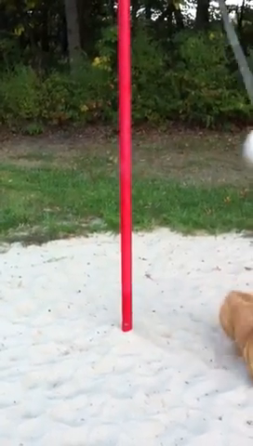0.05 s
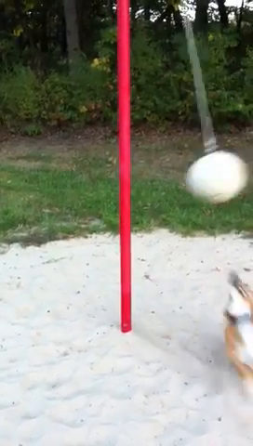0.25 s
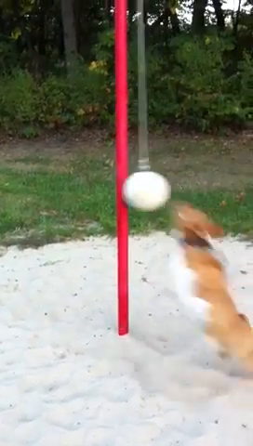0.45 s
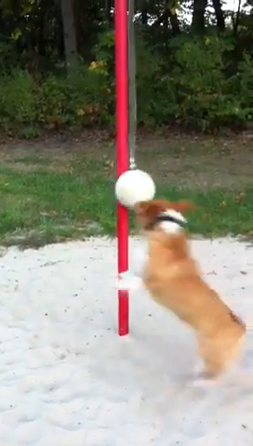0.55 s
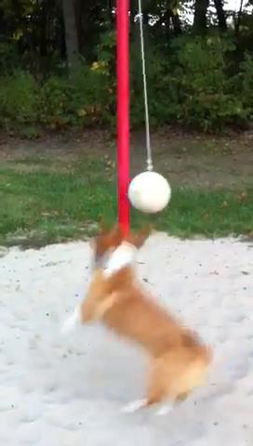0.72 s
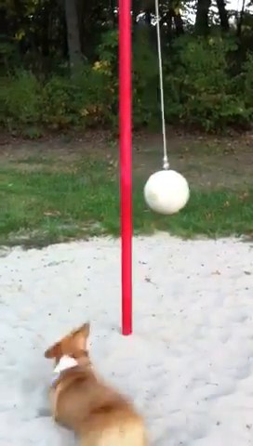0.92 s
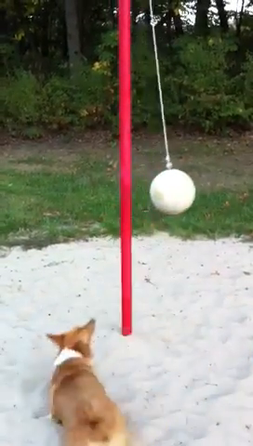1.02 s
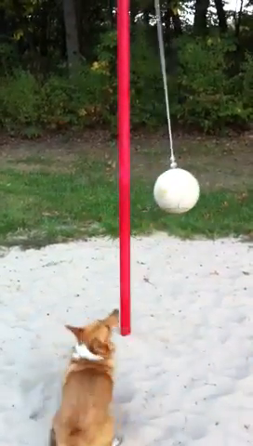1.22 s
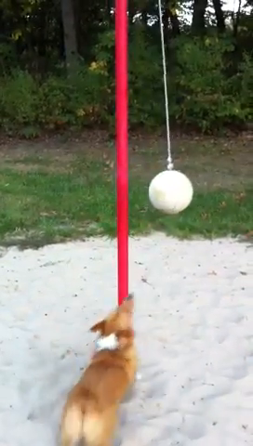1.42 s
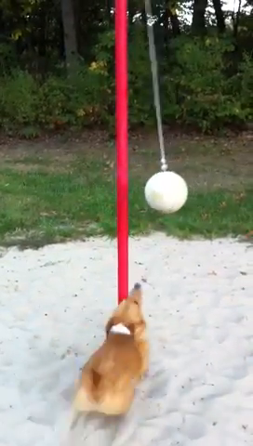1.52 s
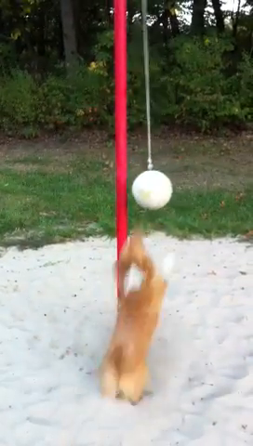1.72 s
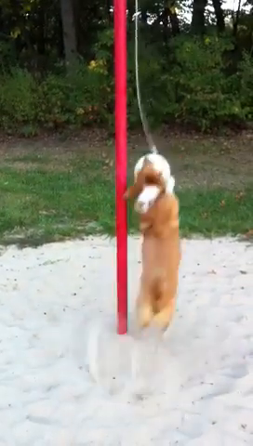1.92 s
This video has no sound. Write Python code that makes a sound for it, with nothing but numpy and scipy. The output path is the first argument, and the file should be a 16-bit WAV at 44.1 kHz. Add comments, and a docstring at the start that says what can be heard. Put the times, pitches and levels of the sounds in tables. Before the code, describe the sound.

Metallic clank on a steel pole with a short wavering ring, collar tags clinking, sand scuffing

```python
"""A dog chases a tetherball on sand, over a soft outdoor wash and a low hum that grows later on.
First a paw kicks up sand, the collar tags clink and rattle, and short knocks sound with them.
Then the ball thuds and the rope's clip strikes the steel pole twice; the pole rings and beats
while the tags rattle on. Sand scuffs again, and late knocks and rattles end the scene.
Tags and pole are sums of fading sine tones; sand and air are noise shaped by a spectrum."""
import sys
import numpy as np
from scipy import signal
from scipy.fft import rfft, irfft
from scipy.io import wavfile
from scipy.ndimage import uniform_filter1d

SR = 44100
rng = np.random.default_rng(int(sys.argv[2]) if len(sys.argv) > 2 else 0)


def put_to_file(sound):
    """Save the sound as 16-bit audio at rate SR, in the file named by the first command-line argument."""
    columns = np.atleast_2d(sound).T  # one column per channel
    safe = np.clip(columns, -1, 1)
    whole_steps = np.round(safe * 32767)
    wavfile.write(sys.argv[1], SR, whole_steps.astype(np.int16))


N = 85995
T = np.arange(N) / SR  # time of each sample in seconds


def amp(db):
    """Turns decibels into a plain multiplier."""
    return 10 ** (np.asarray(db) / 20)


def evened(x):
    """Scales a sound to an average (RMS) level of one."""
    return x / np.sqrt(np.mean(x ** 2) + 1e-20)


def add(mix, s, sound):
    """Adds a sound into the mix from second s, cut off at the end of the mix."""
    part = mix[round(s * SR):][:len(sound)]
    part += sound[:len(part)]


def coloured(x, points):
    """Shapes a sound by a spectrum given as points of pitch in Hz and level in dB."""
    f, db = np.transpose(points)
    hz = np.fft.rfftfreq(len(x), 1 / SR)
    gain_db = np.interp(np.log(hz + 1), np.log(f + 1), db)
    return irfft(rfft(x) * amp(gain_db), len(x))


def ringing(pitches, modes, size):
    """Struck metal: each mode is a sine that fades by 60 dB in its own time t60."""
    t = np.arange(size) / SR
    return sum(amp(db - 60 * t / t60) * np.sin(2 * np.pi * hz * t)
               for hz, (db, t60) in zip(pitches, modes))


def curve(rows):
    """Draws straight lines through points of time and value."""
    return np.interp(T, *np.transpose(rows))


def air():
    """Distant outdoor wash, slightly lumpy, and the low wavering hum of a far engine."""
    # Tilt of the wash. Each row: pitch in Hz, relative level in dB
    wash_colour = [(25, 5), (60, -22), (110, -9.5), (380, -1.5), (636, -5.5), (3190, -20), (12100, -25),
                   (16000, -30.5)]
    # Loudness of the hum. Each row: time in seconds, RMS level in dB
    hum_level = [(.95, -84.5), (1.2, -75)]
    wash_db, lump_db = -58, 0.62
    hum_hz, waver_share = 84.2, 0.0097

    lumps = evened(uniform_filter1d(rng.standard_normal(N), size=900))
    wash = amp(wash_db + lump_db * lumps) * evened(coloured(rng.standard_normal(N), wash_colour))

    waver = 1 + waver_share * evened(uniform_filter1d(rng.standard_normal(N), size=6000))
    hum = np.sin(2 * np.pi * np.cumsum(hum_hz * waver) / SR)
    return wash + np.sqrt(2) * amp(curve(hum_level)) * hum


def sand():
    """Fine grains in the treble and paw scuffs in the middle, swelling with each kick."""
    # Kicked sand. Each row: time of peak, rise and fall in seconds, spray and scuff level in dB
    kicks = [(.215, 0.059, 0.054, -94, -57), (.3, 0.042, .12, -55, -88), (.98, 0.092, 0.029, -60, -65.5),
             (1.038, 0.035, 0.016, -79, -56), (1.929, 0.0062, 0.024, -49.5, -75)]
    # Spectra of the two sounds. Each row: pitch in Hz, relative level in dB
    spray_colour = [(2500, 3), (5000, -8.5), (9000, 1), (16000, 1.5)]
    scuff_colour = [(740, -19), (900, 7), (1250, -10), (1650, 2), (2300, -9), (4000, -16)]

    # noise whose samples differ in size, so that single grains stick out
    grains = rng.standard_normal((2, N)) * amp(1.2 * rng.exponential(1, (2, N)))
    level = np.zeros((2, N))
    for s, rise, fall, *dbs in kicks:
        swell = np.exp(-((T - s) / np.where(T < s, rise, fall)) ** 2)
        level += swell * amp(dbs)[:, None]
    spray = evened(coloured(grains[0], spray_colour)) * level[0]
    scuff = evened(coloured(grains[1], scuff_colour)) * level[1]
    return spray + scuff


def knocks():
    """Ball, paws and buckle: a damped tone swells and dies, gritty if high, with a short crack."""
    # Each row: start in seconds, tone level in dB, pitch in Hz, time to peak in seconds, crack in dB
    knock_rows = [(0.2228, -46.5, 3150, 0.0013, -43), (0.2431, -34.5, 5600, 0.0009, -33),
                  (.2431, -41, 3120, .0018, -60), (0.2483, -36, 4040, 0.001, -39),
                  (.5738, -37, 2900, 0.0006, -43), (.575, -47, 1750, 0.0012, -48),
                  (.5742, -45, 760, .001, -73), (.6164, -33.5, 813, 0.0012, -42),
                  (.6172, -46, 1500, 0.001, -48), (0.6162, -40, 425, .002, -70),
                  (.616, -51, 134, 0.0034, -80), (.972, -53, 172, 0.0037, -80),
                  (1.7035, -37, 239, 0.002, -67), (1.924, -49, 760, .002, -50)]
    # Spectrum of the crack. Each row: pitch in Hz, relative level in dB
    crack_colour = [(500, -14), (2500, 0), (16000, -8)]
    crack_s = 0.0016  # time for the crack to fall to about a third
    grit_db, full_grit_hz = -6, 2000  # grit is noise around the pitch, weaker below full_grit_hz

    out, t = np.zeros(N), T[:4000]
    for s, db, hz, peak_s, crack_db in knock_rows:
        grit = coloured(rng.standard_normal(len(t)), [(hz / 2, -20), (hz, 0), (hz * 2, -20)])
        grit_level = amp(grit_db) * min(hz / full_grit_hz, 1) ** 2
        tone = grit_level * evened(grit) - np.sin(2 * np.pi * hz * t)
        swell = t / peak_s * np.exp(1 - t / peak_s)
        crack = np.exp(-t / crack_s) * evened(coloured(rng.standard_normal(len(t)), crack_colour))
        add(out, s, amp(db) * tone * swell + amp(crack_db) * crack)
    return out


def pole():
    # Clip on pole. Each row: start in seconds, level in dB
    clip_hits = [(.6405, -46.5), (.6452, -39)]
    # Pitch of each pole mode in Hz
    mode_hz = [330, 1384, 1958, 2269, 3098, 3164, 3257, 4280, 5136, 8770, 8398, 8507, 2600, 3865]
    # The same modes. Each row: relative level in dB, t60 in seconds
    modes = [(-12, 0.6), (-11, 0.31), (-13, 0.12), (-12.5, 0.14), (-4, 0.57), (-11, 0.31), (-5, 0.17),
             (-12, .07), (-16, 0.1), (-14, 0.1), (-7, 0.3), (-6, .09), (-14, .08), (-16, .1)]
    # Beats of the ring mode. Each row: time in seconds, RMS level in dB
    ring_level = [(.641, -61), (.648, -47.5), (.68, -53), (.7, -37.5), (.72, -46), (.74, -44),
                  (.765, -56.5), (.795, -64.5), (.815, -54), (.84, -58.5), (.85, -76), (.868, -55),
                  (.89, -70.5), (.98, -60.5), (1.02, -71), (1.12, -70), (1.2, -84)]
    clang_db, clang_t60_s = -1.5, 0.17  # dense short modes heard as a burst; dB before the filter
    clang_band_hz = [2470, 9250]
    attack_s = 0.00033
    ring_base_hz = 3022
    # the wave back from the far end comes in sharp, then settles
    return_s, return_sharp_hz, return_settle_s = .685, 45, .011

    out, t = np.zeros(N), T[:30000]
    band = signal.butter(1, clang_band_hz, "band", fs=SR)
    for s, db in clip_hits:
        clang = signal.lfilter(*band, rng.standard_normal(len(t)))
        clang *= amp(clang_db - 60 * t / clang_t60_s)
        attack = np.minimum(t / attack_s, 1)
        add(out, s, amp(db) * attack * (ringing(mode_hz, modes, size=30000) + clang))

    sharpness = (T > return_s) * np.exp(-abs(T - return_s) / return_settle_s)
    ring_hz = ring_base_hz + return_sharp_hz * sharpness
    sounding = (T > ring_level[0][0]) & (T < ring_level[-1][0])
    beats = sounding * amp(uniform_filter1d(curve(ring_level), size=200))
    return out + np.sqrt(2) * beats * np.sin(2 * np.pi * np.cumsum(ring_hz) / SR)


def collar():
    """Bursts of tiny collisions make each tag ring and add short noisy ticks."""
    # Rattles. Each row: start in seconds, length in seconds, level of each of four tags in dB
    rattles = [(.224, 0.0031, -42, -40, -52, -53), (.229, 0.0012, -63, -56, -50, -33.5),
               (0.2431, 0.0006, -17, -26, -20, -28), (0.2478, 0.0025, -40, -44, -34, -32),
               (0.255, 0.0022, -42, -66, -67, -62), (0.418, 0.0068, -56, -64, -47, -49),
               (.425, 0.0071, -66, -48.5, -42, -61), (0.436, 0.0051, -59, -60, -48, -53),
               (0.7424, 0.0031, -79, -52, -55, -48.5), (.799, 0.0086, -65, -59, -58.5, -61),
               (.884, .017, -77, -49.5, -53, -76), (.9767, .012, -70, -54.5, -59, -73),
               (0.994, 0.0072, -71, -62, -62, -53), (1.07, 0.0058, -62, -52, -56, -61),
               (1.433, 0.021, -66, -55, -48, -64), (1.452, 0.0053, -64, -45.5, -51, -55),
               (1.472, .003, -62, -62, -60, -53), (1.4814, 0.0016, -59, -57, -49, -42.5),
               (1.494, .004, -64, -59, -58, -60), (1.655, 0.01, -72, -49, -49.5, -52),
               (1.69, 0.0016, -54, -58, -47, -56), (1.843, 0.017, -66, -63.5, -76, -60.5),
               (1.9205, 0.0067, -66, -53, -68, -66)]
    # Mode pitches in Hz, one list for each tag
    tag_hz = [
        [5785, 7650, 8960, 13270],
        [5430, 9120],
        [12490, 14950],
        [8350, 9830, 11300, 13940, 15400],
    ]
    # The same modes, one list for each tag. Each row: relative level in dB, t60 in seconds
    tag_modes = [
        [(-27, .13), (-4, 0.0072), (-2, 0.014), (-4.5, 0.055)],
        [(-16, 0.014), (0.5, .02)],
        [(-2, 0.016), (-10, .015)],
        [(-5, 0.012), (-11.5, 0.015), (-2.5, 0.0095), (-1, 0.0098), (-14, 0.013)],
    ]
    # Spectrum of the ticks. Each row: pitch in Hz, relative level in dB
    tick_colour = [(3000, -37), (7000, -10), (16000, 19.5)]
    hits_per_s, hit_spread_db = 3000, 5  # chance of hits on each tag, and how much they differ
    tick_s, tick_db = 0.00039, -16
    # short modes shift from rattle to rattle as the tags hang differently
    detune_share, detune_t60_s = .004, .02

    out, power = np.zeros(N), np.zeros(N)
    for start, length, *dbs in rattles:
        draw = rng.random((len(tag_modes), 1400, 3))
        hit = (draw[..., 0] < hits_per_s / SR) & (np.arange(1400) < length * SR)
        hit[:, 0] = True  # every tag is hit at the start
        sign = np.sign(draw[..., 1] - .5)
        size = hit * sign * amp(hit_spread_db * -np.log(draw[..., 2] + 0.021))
        # longer rattles hold more energy, shared among their hits
        size *= amp(dbs)[:, None] * np.sqrt(length * 1000 / (size ** 2).sum(1, keepdims=True))
        add(power, start, (size ** 2).sum(0))
        for tag_hits, hz, modes in zip(size, tag_hz, tag_modes):
            # modes that fade within detune_t60_s shift in full, longer-ringing ones less
            t60 = np.transpose(modes)[1]
            loose = np.minimum(detune_t60_s / t60, 1) ** 2
            shifted = hz * (1 + detune_share * loose * rng.standard_normal(len(hz)))
            add(out, start, signal.oaconvolve(tag_hits, ringing(shifted, modes, size=6000)))

    tick = amp(tick_db) * evened(coloured(rng.standard_normal(N), tick_colour))
    tick_power = signal.oaconvolve(power, np.exp(-T[:600] / tick_s))[:N]
    return out + tick * np.sqrt(abs(tick_power))


def scene():
    """All layers together, as one channel."""
    return (air() + sand() + knocks() + pole() + collar())[None]


def record(dry):
    """Small microphone: the bass rolls off, then the top of the treble is cut."""
    low_cut_hz, top_hz = 94.5, 15900
    thin = signal.lfilter(*signal.butter(2, low_cut_hz, "high", fs=SR), dry)
    top_cut = signal.firwin(301, top_hz, window=("kaiser", 9), fs=SR)
    return signal.oaconvolve(thin, top_cut[None], "same")


dry = scene()
out = record(dry)
put_to_file(out)
```